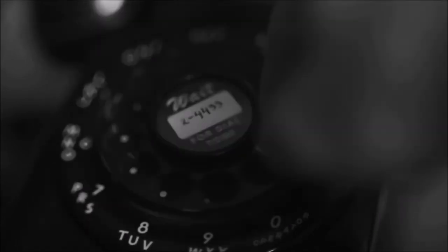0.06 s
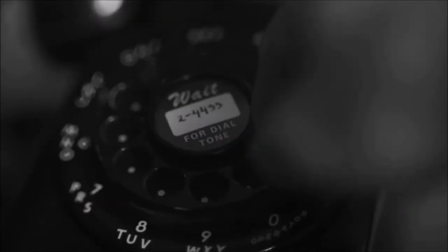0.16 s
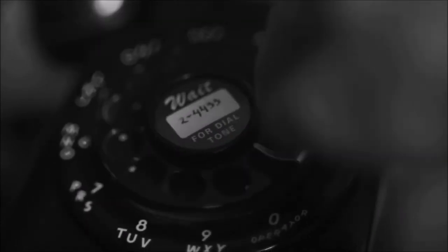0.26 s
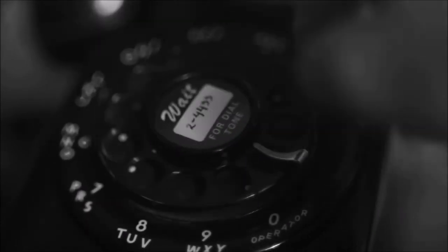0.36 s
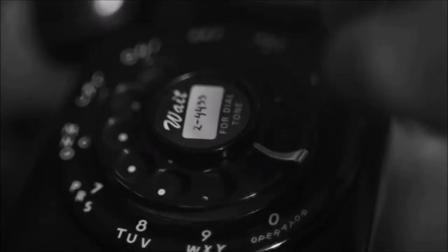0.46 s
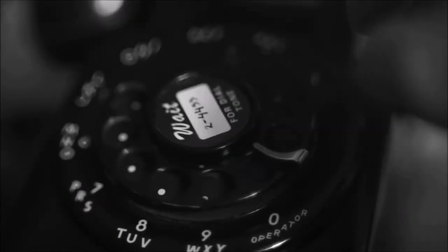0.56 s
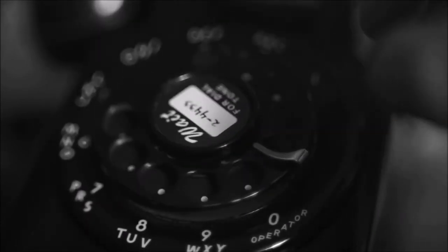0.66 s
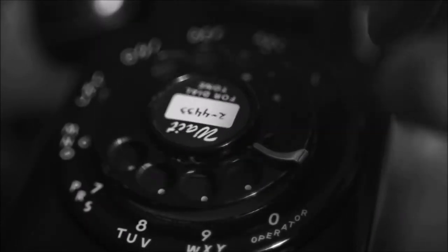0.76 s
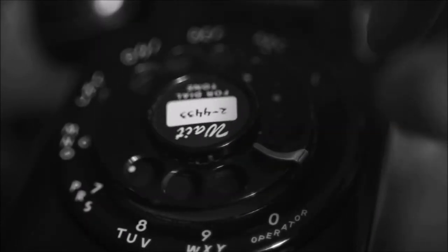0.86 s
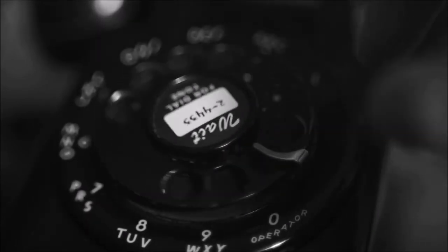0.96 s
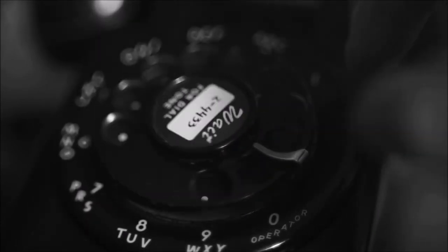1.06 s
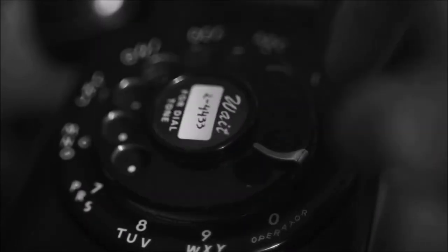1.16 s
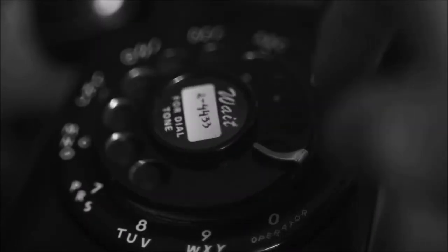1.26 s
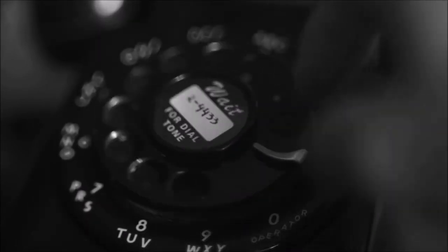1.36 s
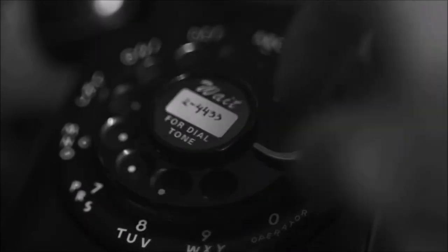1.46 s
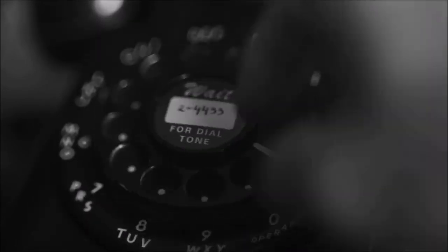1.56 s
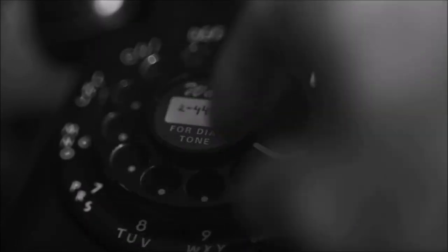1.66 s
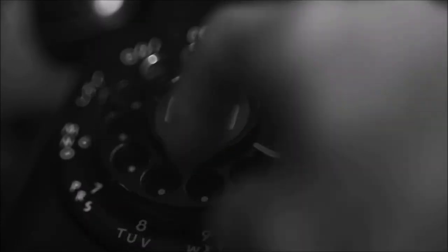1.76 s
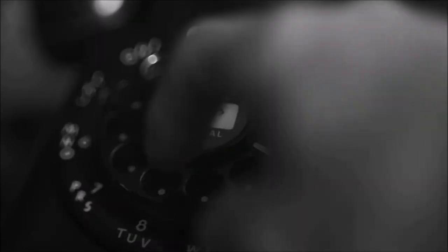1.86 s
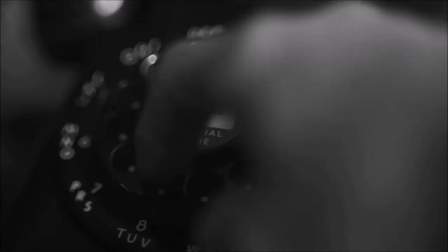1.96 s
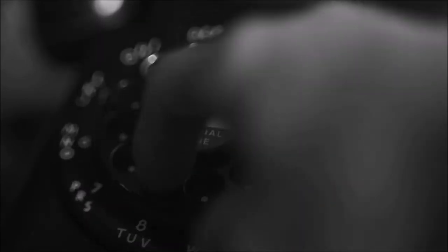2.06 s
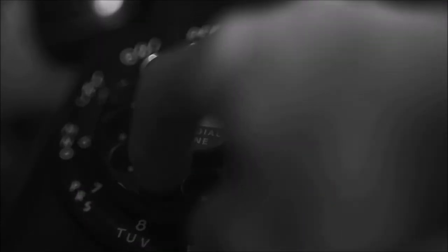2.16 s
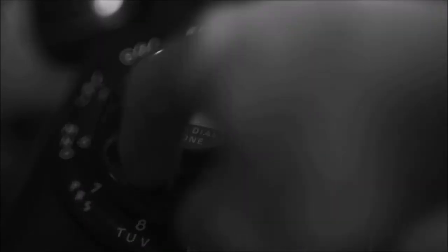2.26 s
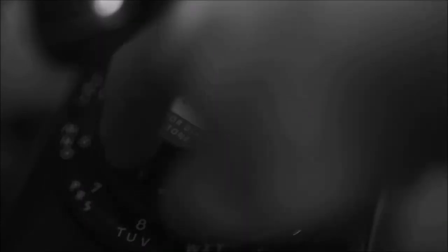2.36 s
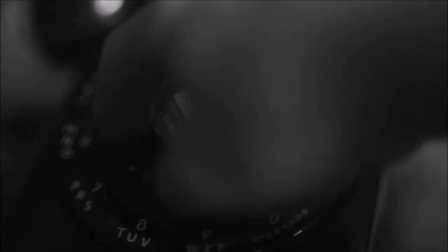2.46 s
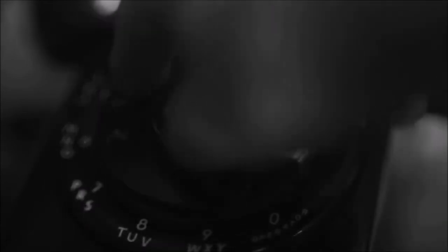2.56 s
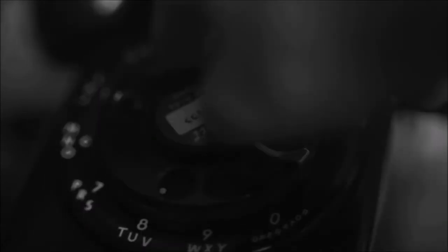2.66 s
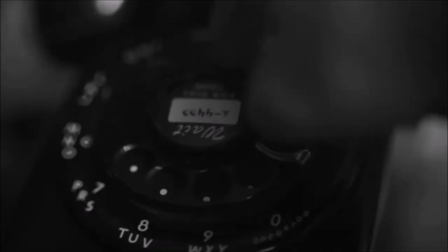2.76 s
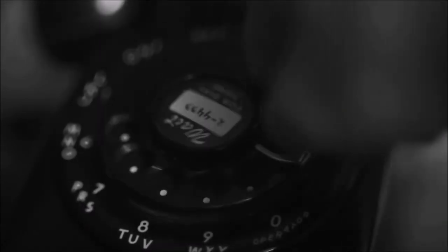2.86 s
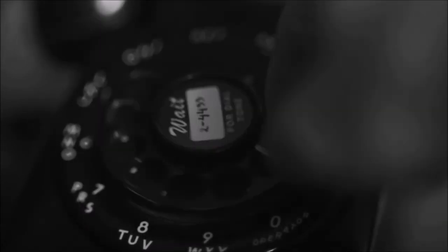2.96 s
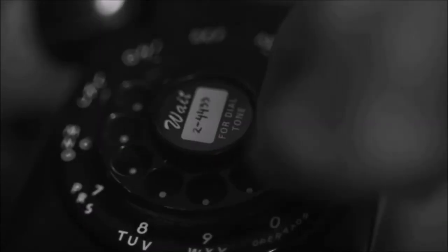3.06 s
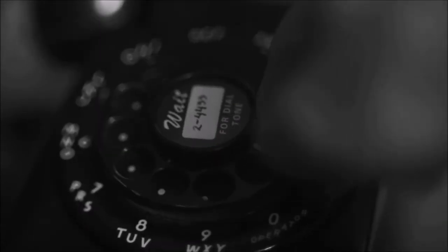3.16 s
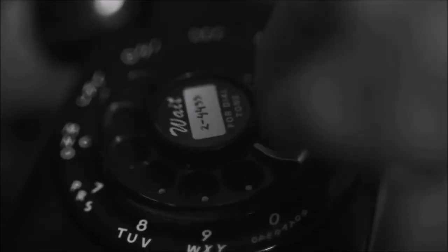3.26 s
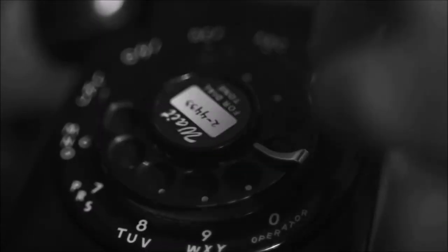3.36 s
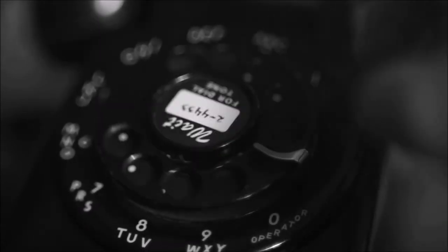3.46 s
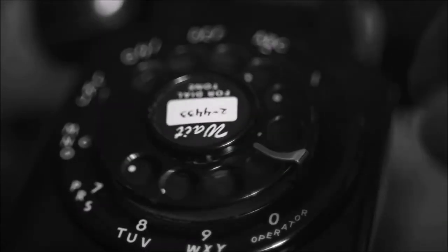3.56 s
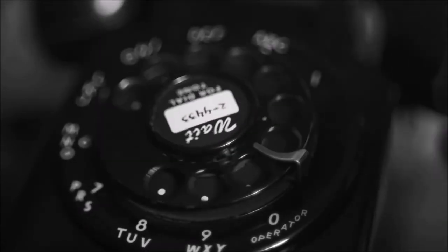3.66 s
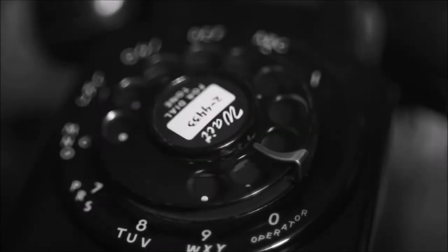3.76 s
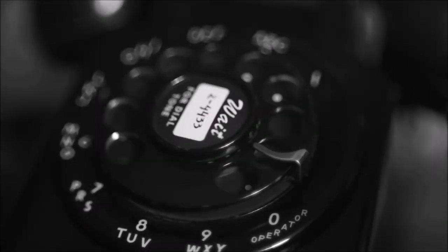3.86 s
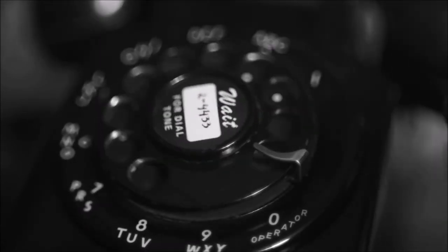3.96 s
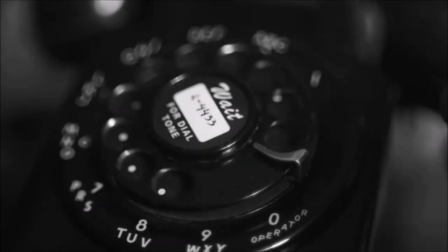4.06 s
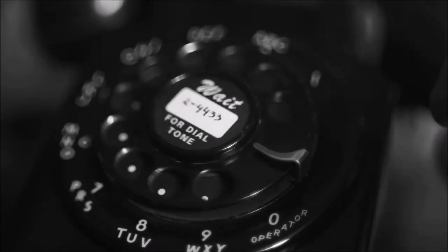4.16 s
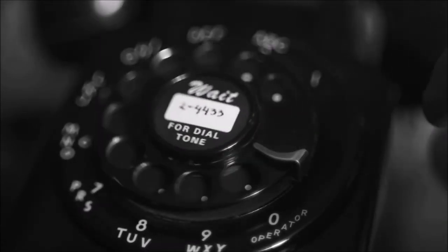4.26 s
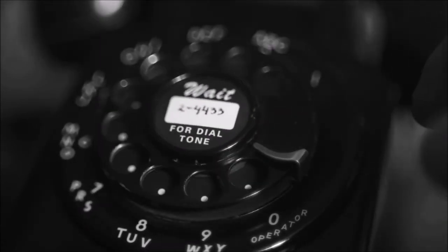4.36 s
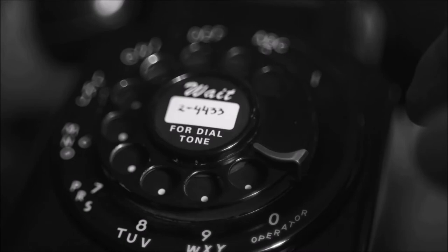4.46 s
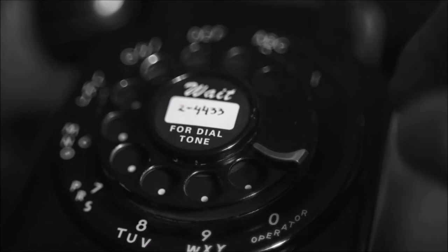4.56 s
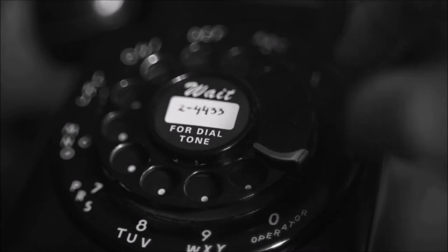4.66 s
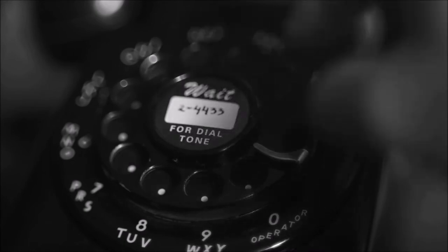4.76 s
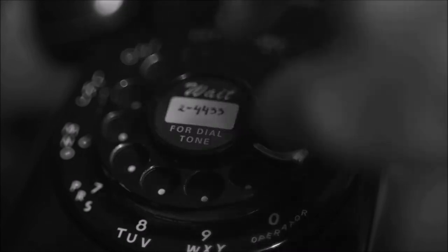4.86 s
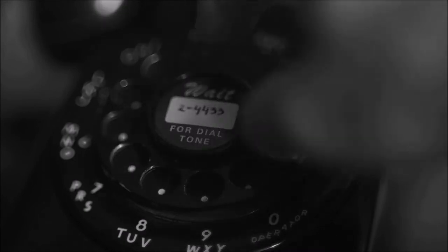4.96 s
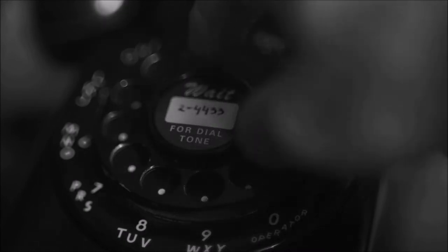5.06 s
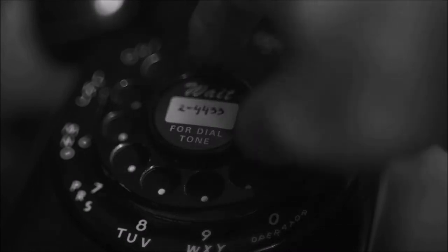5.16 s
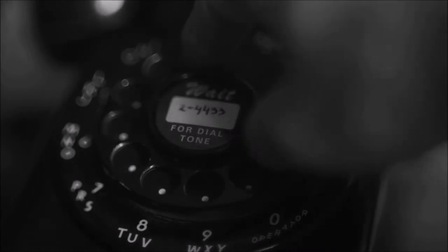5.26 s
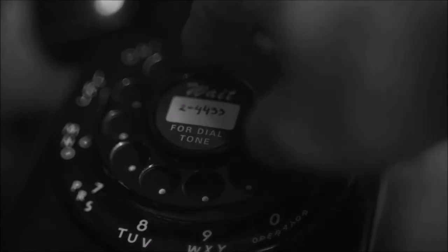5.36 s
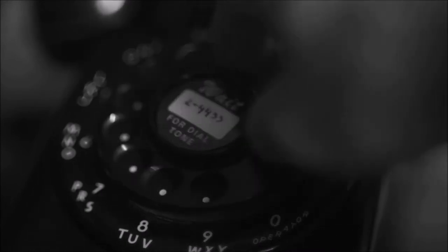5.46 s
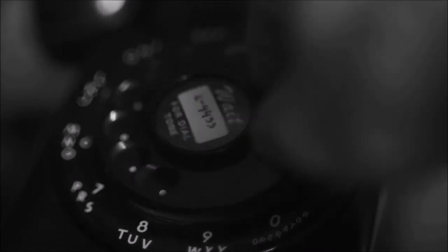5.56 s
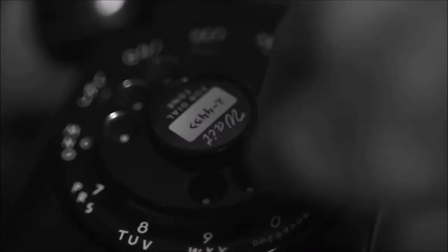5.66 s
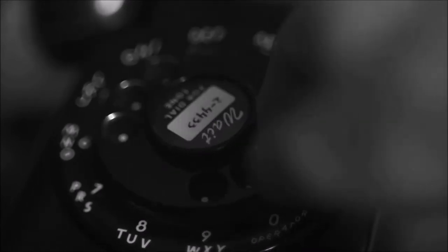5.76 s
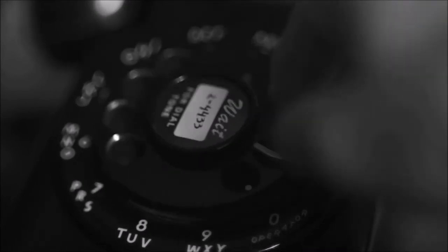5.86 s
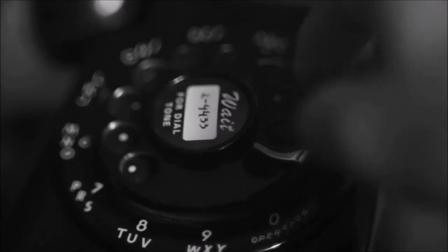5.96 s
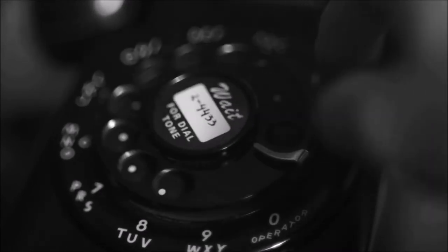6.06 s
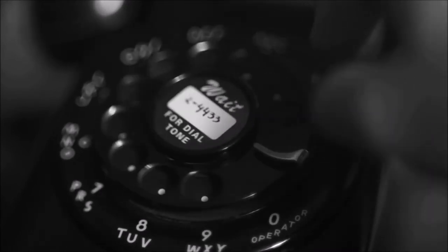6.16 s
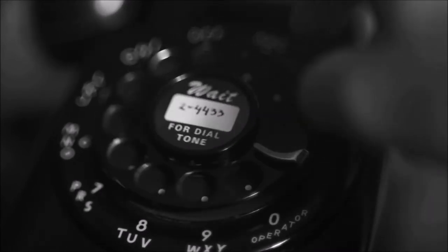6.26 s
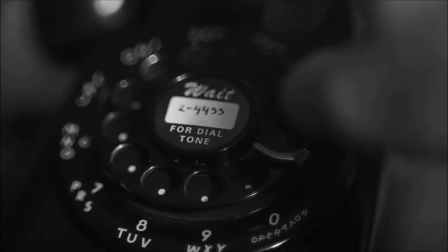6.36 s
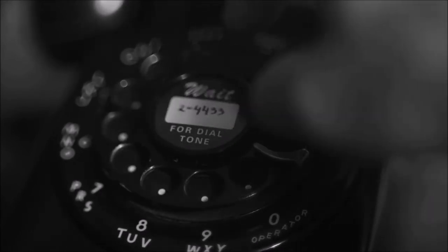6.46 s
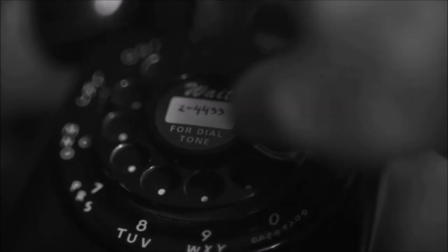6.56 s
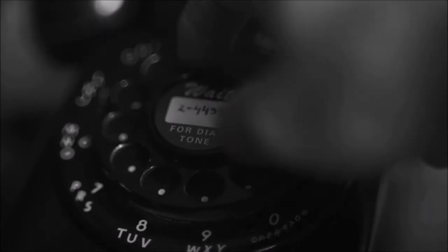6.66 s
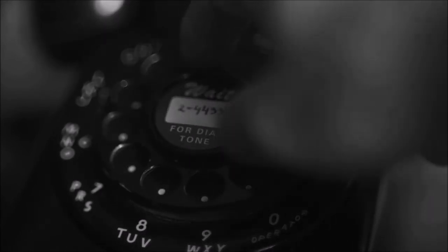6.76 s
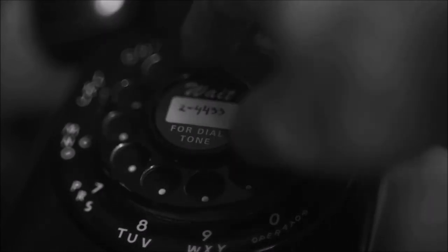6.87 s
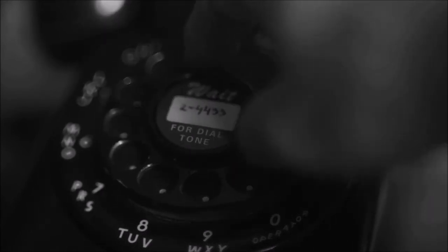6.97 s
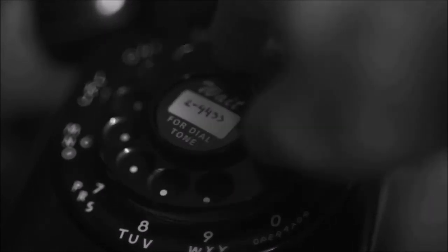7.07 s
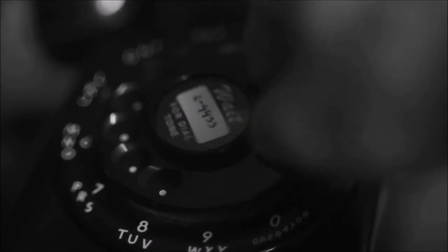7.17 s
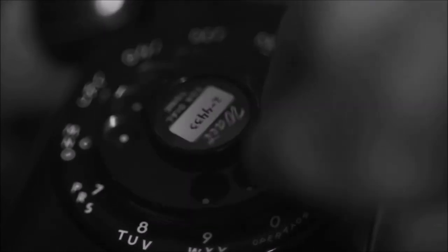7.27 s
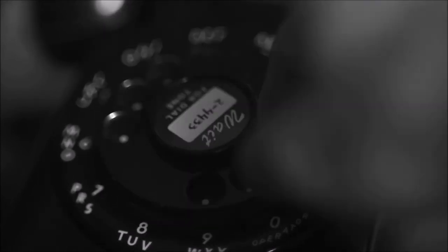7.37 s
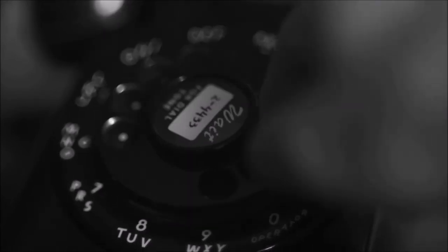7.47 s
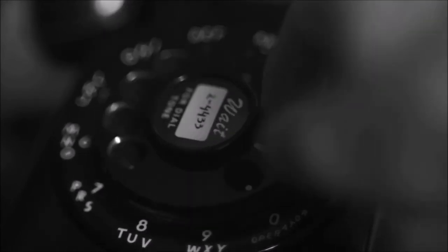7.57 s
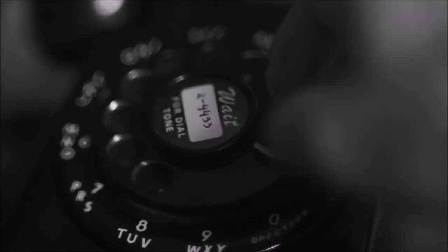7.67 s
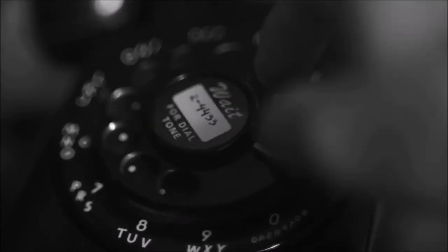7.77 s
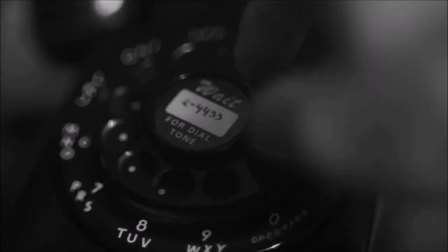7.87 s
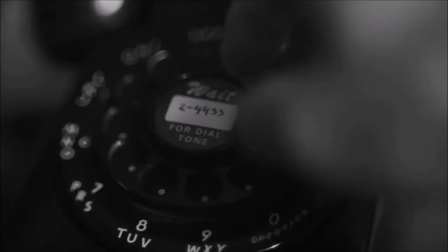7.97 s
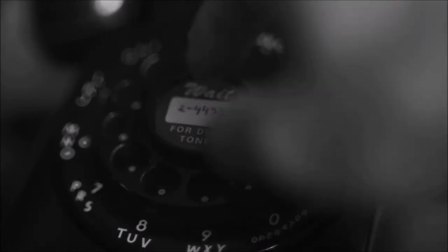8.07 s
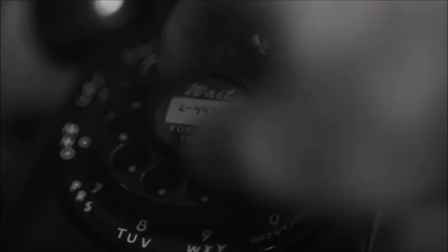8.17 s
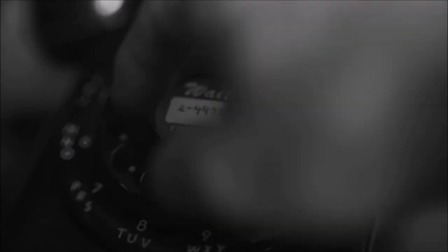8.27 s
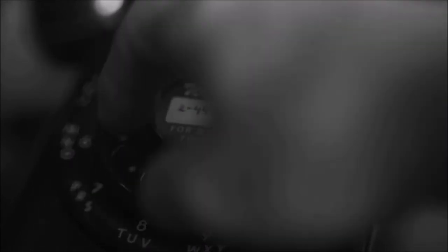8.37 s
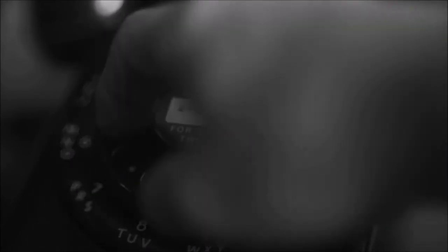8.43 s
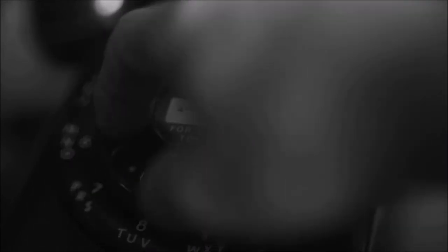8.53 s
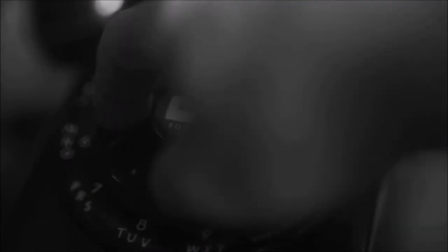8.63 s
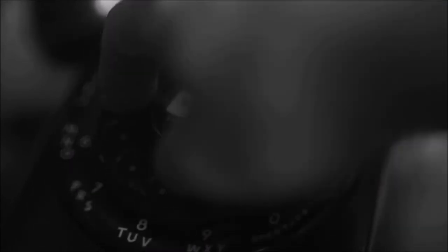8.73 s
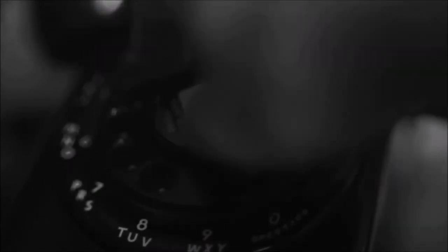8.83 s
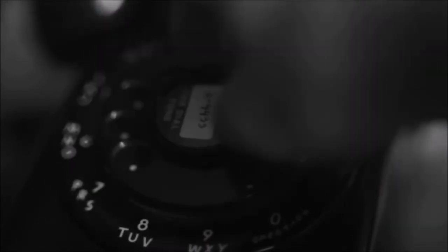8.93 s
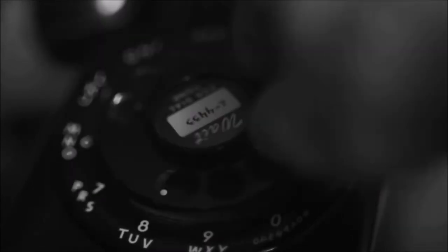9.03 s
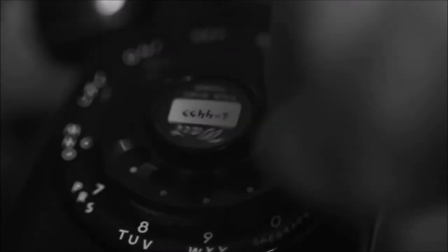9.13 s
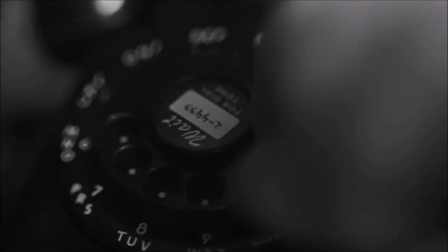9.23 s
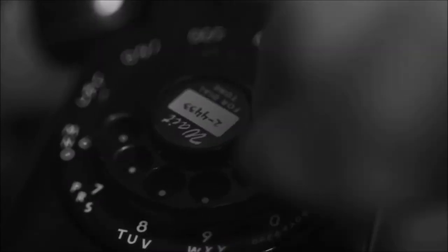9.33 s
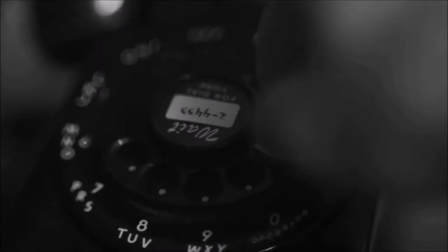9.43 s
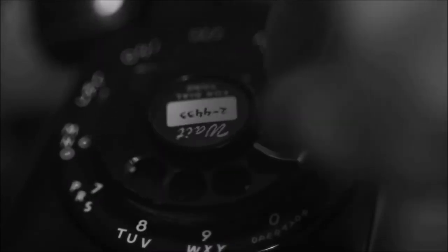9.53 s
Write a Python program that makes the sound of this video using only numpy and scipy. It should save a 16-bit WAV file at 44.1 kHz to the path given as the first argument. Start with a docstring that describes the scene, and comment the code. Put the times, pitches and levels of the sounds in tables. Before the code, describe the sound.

A finger winds a rotary telephone dial five times, each scraping turn followed by a whirring return with quick, even clicks, over faint hum.

```python
"""First comes a short scrape with ratchet clicks: a finger winds an old rotary telephone dial to its stop.
The finger lets go and the gears whirr back, held to an even speed by a small brake, the governor.
Electric contacts click about eight times a second, until the wheel hits its rest and a spring rings.
The dial is turned five times, close by, while the hand bumps and shifts the telephone on the desk.
Mains hum fills the small room."""
import sys
import numpy as np
from scipy import signal
from scipy.fft import rfft, irfft, next_fast_len
from scipy.io import wavfile
from scipy.ndimage import uniform_filter1d, map_coordinates

SR = 44100
rng = np.random.default_rng(int(sys.argv[2]) if len(sys.argv) > 2 else 0)


def master(y):
    """Save y as 16-bit WAV."""
    cut = np.clip(np.atleast_2d(y).T, -1, 1)
    pcm = np.round(cut * 32767)  # scale
    wavfile.write(sys.argv[1], SR, pcm.astype(np.int16))


N = 423360
TIME = np.arange(N) / SR
AGE = np.arange(SR // 2) / SR  # seconds since a hit

# Levels are relative: each layer gets its own gain in the mix. A decay (t60) is the time to fall 60 dB.
# The finger winds the dial: (grip [s], about the first notch [s], stop [s], pull [dB], last push [dB],
# push before the stop [s], touch before the grip [s], skid pitch [Hz])
WIND_UPS = [(-0.64, -0.52, 0.1083, -46, 6.5, 0.068, .05, 6100),
            (2.3398, 2.468, 3.0424, -47.2, 1.5, 0.03, .085, 7030),
            (5.4879, 5.58, 5.6995, -45.5, 5.5, 0.034, .055, 7550),
            (7.092, 7.184, 7.333, -44.2, 1.5, 0.058, .05, 7660),
            (8.742, 8.858, 9.2262, -45.5, 8, 0.062, .08, 7800)]
# The pawl, the ratchet's catch, drops into a notch: (time [s], level [dB], flare [dB], bounce gap [s])
PAWL_DROPS = [(0.042, -18, 0.5, 0.0093), (0.087, -21, 1, 0.015), (2.4682, -25.5, 2, 0.017),
              (2.5514, -24, 4, .013), (2.626, -23, 5, 0.012), (2.6913, -23.5, 1.5, 0.02),
              (2.7826, -21.5, 2, 0.02), (2.8717, -21, 3.5, 0.0085), (2.9485, -21.5, 4.5, 0.012),
              (3.0225, -22.5, 2.5, .01), (5.58, -25, 3, 0.015), (5.636, -29, 5, 0.015),
              (5.669, -25, 0.14, .01), (7.143, -31, 3.5, 0.0087), (7.1877, -23, 1.5, 0.011),
              (7.2516, -25, 4.5, 0.0092), (7.316, -18.5, 1, 0.01), (8.8533, -24, 4.5, 0.012),
              (8.9326, -23.5, 0, 0.014), (9.0266, -24, 4.5, .011), (9.0926, -19, 2.5, 0.016),
              (9.151, -18.5, 2, 0.0093), (9.1966, -24.5, 0.5, 0.021)]
# The pawl's two bounces, compared with its drop: (first [dB], second [dB])
PAWL_BOUNCES = [-5, -5]
# The hit on the steel finger stop that ends each turn: (level [dB], pitch [Hz])
STOP_HITS = [(-15.5, 5980), (-13, 7370), (-12.5, 7600), (-19, 7600), (-13, 7750)]
# The finger grazes the stop or slips off it: (time [s], level [dB], pitch [Hz])
STOP_GRAZES = [(0.168, -36.5, 5660), (0.2509, -27, 5800), (2.016, -47, 6100), (3.136, -33, 6980),
               (5.604, -24.5, 7900), (7.3237, -17.5, 7470), (7.443, -33, 7550), (7.456, -37, 7000),
               (8.965, -28, 7900), (9.337, -22, 7470), (9.399, -28.5, 7450)]
# The dial runs back: (start [s], landing [s], whirr [dB], brake pitch [Hz], brake against whirr [dB],
# case thump against landing [dB], starting knock [dB], landing [dB])
RUN_BACKS = [(0.2515, 1.5876, -42.5, 5100, -14, -22.5, -21, -10),
             (3.218, 4.3155, -42.5, 5100, -13.5, -24, -18, -5.5),
             (5.8638, 6.35, -42.5, 7450, -12, -19, -24, -7.5),
             (7.5223, 8.0207, -42.5, 7400, -13.5, -15.5, -24, -10),
             (9.3978, 10.265, -41.5, 7700, -8, -21, -18, -9)]
# A cam, a bumpy wheel, snaps the contacts, lightly at first: (time [s], level [dB])
CONTACT_SNAPS = [(0.2947, -35), (0.4122, -22), (0.5316, -22.5), (0.6529, -23), (0.7731, -23.5),
                 (0.8976, -23.5), (1.0194, -23), (1.1468, -23.5), (1.2735, -23.5), (1.4018, -23.5),
                 (1.5339, -25), (3.251, -28), (3.3829, -24), (3.5023, -24), (3.6254, -23.5), (3.748, -23),
                 (3.8738, -23), (4.0008, -24), (4.129, -23.5), (4.2611, -23.5), (5.898, -30), (6.0357, -24),
                 (6.1638, -22.5), (6.2958, -23.5), (7.5657, -30), (7.7046, -23.5), (7.8344, -21.5),
                 (7.9663, -23), (9.438, -27.5), (9.5735, -22)]
# The hand bumps the telephone: (time [s], level [dB])
HAND_BUMPS = [(1.272, -30), (2.617, -34), (5.289, -36.5), (5.43, -49), (5.793, -41), (8.792, -31),
              (8.903, -40)]
# The hand shifts the telephone: (start [s], end [s], level [dB])
HAND_SHIFTS = [(1.3, 2.02, -48.5), (2.294, 2.71, -54.5), (5.28, 6.143, -48), (8.851, 9.26, -50.5)]

# The notes a struck part rings with: (pitch [Hz], level [dB], decay [s])
SPRING_MODES = [(5609, -11, 0.5), (7700, 3, .15), (8200, 0, .12), (8452, 1, 0.46), (8586, -9, .4)]  # the rest and the return spring
CASE_MODES = [(430, -5, .11), (465, -4, .07), (538, 0, .12), (645, -9, .15), (1400, -4, .06),
              (1720, 0, .05), (1870, -2, .05), (2900, 0, .04), (4700, -4, .035)]  # the hollow case
ROCKING_MODES = [(38, -7, 0.19), (68.6, 0.5, 0.15), (102, 1.5, 0.1), (137, -1.5, 0.11)]  # the telephone rocking on the desk
# Resonances of the case (low) and the metal works (high): (frequency [Hz], width [Hz], boost [dB])
DIAL_RESONANCES = [(423, 30, 11), (462, 26, 7), (537, 28, 11.5), (644, 30, 6.5), (782, 24, 6.5),
                   (934, 27, 4), (1104, 24, 7), (1173, 45, 7.5), (1455, 40, 7.5), (1595, 40, 5),
                   (1720, 110, 6), (1844, 60, 7.5), (2850, 150, 5), (3115, 117, 5), (4030, 190, 5),
                   (4740, 120, 7), (6083, 120, 6), (6504, 130, 8.5), (7300, 400, 3.5), (7700, 120, 8),
                   (8820, 200, 6), (9610, 150, 6), (11140, 160, 4), (12600, 400, 5), (13700, 250, 8.5)]
# Tone colours, how strong each sound is from bass to treble: (frequency [Hz], level [dB])
SCRAPE_COLOUR = [(220, -20), (350, 0.5), (550, 2.5), (780, 1), (1150, 2), (1800, 4), (2300, -2.5),
                 (3000, -9.5), (3700, -12.5), (5500, -15.5), (7600, -16), (11000, -20), (16000, -20)]
RATCHET_COLOUR = [(300, -32), (1100, -22.5), (1900, -1.5), (2900, 4.5), (3700, -2.5), (5000, 0.5),
                  (7500, 2.5), (9000, 1), (11000, 0.5), (14000, -8), (16000, -8)]
STOP_COLOUR = [(300, -22), (1800, -3.5), (3800, -15.5), (5600, -11.5), (6400, -11), (7150, 8), (7750, 5),
               (8300, -10), (9100, -5), (10300, -16), (13500, -16.5), (16000, -36)]
WHIRR_COLOUR = [(200, -20.5), (330, -4), (430, -4.4), (540, -2.5), (700, -8), (1150, -3.5), (1800, -4),
                (2200, -8), (3400, -21), (5000, -27.5), (6600, -20.5), (8200, -26.5), (9600, -21),
                (10300, -37), (16000, -52)]
CONTACT_COLOUR = [(300, -0.5), (1800, 1), (3500, -2), (4800, -0.5), (6500, 3.5), (8000, -0.5), (9200, 3),
                  (10500, 1), (12000, 2), (13600, 4), (14200, -3), (15000, -7), (16000, -13)]
LANDING_COLOUR = [(100, -43), (280, -23.5), (420, -21.5), (800, -21.5), (1300, -12), (1850, -8.5),
                  (2400, -16.5), (3000, -17), (3700, -20), (4700, -23), (5500, -20.5), (6050, -3),
                  (6500, -6), (7100, -8.5), (7650, 0), (8200, -5), (9500, -13.5), (10500, -23),
                  (12800, -17.5), (14500, -31)]
LOOSE_GEAR_COLOUR = [(300, 7), (1200, -2.5), (1700, 7.5), (2350, 9), (3500, -14.5), (5000, -8),
                     (6200, -6.5), (8000, -5.5), (10500, -14), (16000, -14)]
AIR_COLOUR = [(12, -49), (20, -23), (91, -14.5), (123, -8.5), (150, -13), (187, -13.5), (210, -20),
              (248, -12.5), (377, -16), (485, -11.5), (542, -19), (1150, -18), (1440, -25), (7950, -36.5),
              (16000, -45)]
# How long the room's echo lasts: (frequency [Hz], decay [s])
ROOM_DECAY = [(200, 0.22), (2000, 0.16), (8000, 0.18), (15000, 0.14)]
# Mains hum and a thin whine: (pitch [Hz], level [dB])
HUM_TONES = [(120, -57.5), (180, -67.5), (12000, -90)]


def winding():
    """Faster winding makes the gears scrape louder, denser and brighter."""
    turns = [finger_pull(*wind[:-1]) for wind in WIND_UPS]
    rub_db = -57  # the finger rubs faintly between the stop and letting go
    linger = gain_curves([[(stop, rub_db), (start, rub_db)]
                          for (_, _, stop, *_), (start, *_) in zip(WIND_UPS, RUN_BACKS)])
    effort = np.maximum(sum(turns), linger)
    speed = effort / effort.max()
    grains = teeth(300 + 700 * np.sqrt(speed), jitter=0.3, scatter_db=2, t60=0.012)
    skid = sum(turn * through_dial(grains, rubbing_colour(hz)) for turn, (*_, hz) in zip(turns, WIND_UPS))
    crackle = teeth(160 + 500 * speed, jitter=0.35, scatter_db=4, t60=0.008)
    grit = effort * through_dial(crackle, RATCHET_COLOUR)
    metal = speed ** 1.2 * (amp(-1.5 + 7.6 * wobble(90)) * skid + amp(-4) * grit)
    scrape = amp(2) * effort * through_dial(grains, SCRAPE_COLOUR) + metal
    return amp(-4.5) * in_room(scrape, wet_db=-7)


def finger_pull(grip, first_notch, stop, pull_db, push_db, push_lead, touch_lead,
                bite_s=0.008, push_width_s=0.03, ease_db_per_s=230.5, flare_s=0.04):
    """The effort of one turn: it meets the spring, flares at notches, gives a last push and eases off."""
    touch, taut = grip - touch_lead, first_notch - 0.041
    db = pull_db + np.interp(TIME, [touch, taut - bite_s, taut], [-7, -2.5, 0])  # touch, slack, full pull
    db += push_db * np.exp(-((TIME - stop + push_lead) / push_width_s) ** 2)
    db -= ease_db_per_s * np.abs(TIME - np.clip(TIME, touch, stop))
    for s, _, flare_db, _ in PAWL_DROPS:
        add(db, s, flare_db * np.exp(-AGE / flare_s))
    return amp(db)


def pawl(low_hz=5620, high_hz=14400):
    """The catch clicks into each notch and bounces twice; its thin spring pings at random pitches."""
    skips = []
    for s, db, _, gap_s in PAWL_DROPS:
        skips.append((s, db))
        for bounce, loss_db in enumerate(PAWL_BOUNCES, 1):
            skips.append((s + bounce * gap_s, db + loss_db + rng.standard_normal()))
    track = clicks(skips, RATCHET_COLOUR, contact_s=0.00087, t60=0.0086,
                   thump_db=-45, spring_db=-54, wet_db=-0.5)
    for s, db in skips:
        pitches = low_hz * (high_hz / low_hz) ** rng.random(3)
        add(track, s, ring([(hz, db - 14, 0.025) for hz in pitches]))
    return amp(-3.5) * track


def finger_stop(usual_hz=7530, rebound_s=0.0145, rebound_db=-7.5):
    """Each turn hits the steel stop and rebounds once; grazes ring it too."""
    blows = [([(s, db), (s + rebound_s, db + rebound_db)], hz)
             for (_, _, s, *_), (db, hz) in zip(WIND_UPS, STOP_HITS)]
    blows += [([(s, db)], hz) for s, db, hz in STOP_GRAZES]
    track = np.zeros(N)
    for hits, hz in blows:
        colour = [(f * hz / usual_hz, db) for f, db in STOP_COLOUR]
        track += clicks(hits, colour, contact_s=0.0018, t60=0.008,
                        thump_db=-32, spring_db=-56, wet_db=-15)
    return amp(1.5) * track


def spring_twang(slip_s=9.337):
    """A slip of the finger sets the wound return spring ringing."""
    track = np.zeros(N)
    add(track, slip_s, amp(-49) * ring(SPRING_MODES))
    return track


def running_back(spin_up_s=0.0092):
    """The released gears whirr and the governor rattles until the wheel lands."""
    running = gain_curves([[(start - spin_up_s, db), (end, db)] for start, end, db, *_ in RUN_BACKS])
    running = uniform_filter1d(running, size=700)  # soften the edges
    grains = teeth(340 * amp(0.25 * wobble(8)), jitter=0.15, scatter_db=3, t60=0.027)
    whirr = running * amp(wobble(45)) * through_dial(grains, WHIRR_COLOUR)
    return amp(-2) * in_room(whirr + running * governor(), wet_db=-7.5)


def governor(spin_hz=40.2, swing_db=5.5):
    """Brake shoes chatter inside a cup: a thin rattle that swells once per spin."""
    chatter = teeth(520 * amp(0.32 * wobble(8.5)), jitter=0.11, scatter_db=8.5, t60=0.03)
    swell = amp(swing_db * np.sin(2 * np.pi * spin_hz * TIME + wobble(4.7)))
    chatter = unit(chatter * swell)
    return sum(amp(db) * through_dial(chatter, rubbing_colour(hz)) * (TIME > start) * (TIME < end)
               for start, end, _, hz, db, *_ in RUN_BACKS)


def contacts():
    """The cam snaps the electric contacts as the dial runs back."""
    return amp(1) * clicks(CONTACT_SNAPS, CONTACT_COLOUR, contact_s=0.002, t60=0.011,
                           thump_db=-23, spring_db=-51, wet_db=-4)


def landings():
    """The wheel hits its rest, thumping the case and ringing the spring."""
    return amp(-2) * sum(clicks([(s, db)], LANDING_COLOUR, contact_s=0.003, t60=0.009,
                                thump_db=thump_db, spring_db=-37, wet_db=-8)
                         for _, s, *_, thump_db, _, db in RUN_BACKS)


def loose_gears(settle_s=0.085):
    """Loose gear teeth knock together as the wheel is gripped, reverses and settles."""
    knocks = [(grip, -22) for grip, *_ in WIND_UPS]
    for start, landing, *_, knock_db, _ in RUN_BACKS:
        knocks += [(start, knock_db), (landing + settle_s, -37)]
    return amp(-7.5) * clicks(knocks, LOOSE_GEAR_COLOUR, contact_s=0.005, t60=0.02,
                              thump_db=-30, spring_db=-55, wet_db=-7)


def handling(lean_s=0.13, relax_db_per_s=7):
    """The hand rocks the heavy telephone: a low rumble and a few soft bumps."""
    leans = []
    for start, end, db in HAND_SHIFTS:  # the hand's weight comes on, slowly relaxes and lifts
        relaxed_db = db - relax_db_per_s * (end - start)
        leans.append([(start - lean_s, db - 16), (start, db),
                      (end, relaxed_db), (end + lean_s, relaxed_db - 16)])
    push = gain_curves(leans) * rng.standard_normal(N)
    rumble = coloured(push, [(15, -13), (35, -2), (70, -6), (150, -30.5), (350, -14),
                             (1000, -69), (3000, -103)])
    bumps = np.zeros(N)
    for s, db in HAND_BUMPS:
        add(bumps, s, amp(db) * ring(ROCKING_MODES) * (1 - fade(AGE, 0.094)))
    return amp(-2.5) * rumble + amp(1.5) * bumps


def background():
    """A slightly unsteady mains hum over the air of the room."""
    hum = np.zeros(N)
    for hz, db in HUM_TONES:
        peak = np.sqrt(2) * amp(db + 0.24 * wobble(2))
        hum += peak * np.sin(2 * np.pi * hz * TIME + 0.062 * wobble(3.7))
    return hum + amp(-56) * coloured(rng.standard_normal(N), AIR_COLOUR)


def clicks(hits, colour, contact_s, t60, thump_db, spring_db, wet_db):
    """At each (time [s], level [dB]) metal chatters briefly, the case thumps and the spring rings."""
    track = np.zeros(N)
    response = dial_response(colour)
    for s, db in hits:
        if not 0 <= s < N / SR:
            continue
        envelope = fade(np.maximum(AGE - contact_s, 0), t60) * (1 - fade(AGE, 0.0017))
        chatter = rng.choice([-1, 1], len(AGE)) * envelope
        blow = signal.fftconvolve(chatter, response)[:len(AGE)]
        likely_peak = 2.7 * np.linalg.norm(blow) / np.sqrt((contact_s + 0.001) * SR)
        blow = in_room(blow / likely_peak, wet_db)
        thump = ring(CASE_MODES) * (1 - fade(AGE, 0.035))
        add(track, s, amp(db) * (blow + amp(thump_db) * thump + amp(spring_db) * ring(SPRING_MODES)))
    return track


def teeth(rate, jitter, scatter_db, t60):
    """Tiny hits of gear teeth, `rate` a second: bursts of noise, uneven in time and size."""
    at = np.flatnonzero(np.diff(np.floor(np.cumsum(rate) / SR)))
    shift, size = rng.standard_normal((len(at), 2)).T
    at = np.clip(at + jitter * shift * SR / rate[at], 0, N - 1).astype(int)
    blows = np.bincount(at, amp(scatter_db * np.minimum(size, 1.2)), N)
    envelope = signal.fftconvolve(blows, fade(AGE, t60))[:N]
    return unit(envelope * rng.standard_normal(N))


def ring(modes):
    """A struck part rings with fading notes, a little different in strength each time."""
    return sum(amp(db + rng.standard_normal()) * fade(AGE, t60)
               * np.sin(2 * np.pi * (hz * AGE + rng.random())) for hz, db, t60 in modes)


def rubbing_colour(hz):
    """The colour of metal rubbing on metal: one main pitch and a weaker one below."""
    return [(hz / 3.4, -24), (hz / 2.7, -11), (hz / 2, -22), (hz / 1.18, -9),
            (hz, 0), (hz * 1.1, -7), (hz * 1.3, -15), (hz * 1.6, -29)]


def through_dial(x, colour):
    """Rubbing inside the dial takes on a colour and sets the dial resonating."""
    return signal.fftconvolve(x, dial_response(colour))[:N]


def dial_response(colour, size=16384):
    """One tap of this colour, heard through the resonances that the whole dial shares."""
    hz = np.fft.rfftfreq(size, 1 / SR)
    power = 1 + sum(abs(amp(db) ** 2 - 1) / (1 + (2 * (hz - centre) / width) ** 2)
                    for centre, width, db in DIAL_RESONANCES)
    return minimum_phase(value_at(colour, hz) + 10 * np.log10(power))


def in_room(x, wet_db):
    """Add the short echo of the desk and walls, at wet_db against the direct sound."""
    hz, t, noise = signal.stft(rng.standard_normal(len(AGE)), SR, nperseg=256)
    fading = noise * fade(t, value_at(ROOM_DECAY, hz)[:, None])
    tail = signal.istft(fading, SR, nperseg=256)[1][:len(AGE)]
    tail *= np.clip(AGE / 0.0039, 0, 1)  # the first reflections take a few milliseconds
    return x + amp(wet_db) * signal.fftconvolve(x, tail / np.linalg.norm(tail))[:len(x)]


def coloured(x, colour, size=4096):
    """Filter x by a curve of (frequency [Hz], level [dB]) points."""
    response = minimum_phase(value_at(colour, np.fft.rfftfreq(size, 1 / SR)))
    return signal.fftconvolve(x, response)[:len(x)]


def minimum_phase(level_db):
    """The quickest click, of energy 1, with this shape over evenly spaced frequencies."""
    cepstrum = irfft(np.log(amp(level_db)))
    half = len(cepstrum) // 2
    cepstrum[1:half] *= 2
    cepstrum[half + 1:] = 0
    response = irfft(np.exp(rfft(cepstrum)))
    return response / np.linalg.norm(response)


def amp(db):
    """Decibels to gain."""
    return 10 ** (np.asarray(db) / 20)


def unit(x):
    """Scale x to an average power of 1."""
    return x / np.sqrt(np.mean(x ** 2) + 1e-20)


def value_at(points, hz):
    """Read between (frequency [Hz], value) points on a log frequency axis."""
    frequencies, values = np.transpose(points)
    return np.interp(np.log(hz + 1), np.log(frequencies + 1), values)


def fade(t, t60):
    """Die away by 60 dB every t60 seconds."""
    return np.exp(-np.log(1000) * t / t60)


def wobble(rate):
    """A smooth curve through `rate` random values a second."""
    return map_coordinates(rng.standard_normal(int(N * rate / SR) + 4), [TIME * rate])


def gain_curves(curves):
    """Gain that follows curves of (time [s], level [dB]) points, silent between the curves."""
    return sum(amp(np.interp(TIME, *np.transpose(points), left=-120, right=-120)) for points in curves)


def add(track, s, sound):
    """Mix a sound in at s seconds."""
    part = track[max(round(s * SR), 0):][:len(sound)]
    part += sound[:len(part)]


def scene():
    """The dial, the hand and the room in one channel."""
    wind_up = winding() + pawl() + finger_stop() + spring_twang()
    run_back = running_back() + contacts() + landings()
    return (wind_up + run_back + loose_gears() + handling() + background())[None]


def record(dry, top_hz=16000):
    """Cut away all treble above top_hz."""
    size = next_fast_len(N + SR // 2)
    kept = np.fft.rfftfreq(size, 1 / SR) < top_hz
    return irfft(rfft(dry, size) * kept, size)[:, :N]


dry = scene()
out = record(dry)
master(out)
```